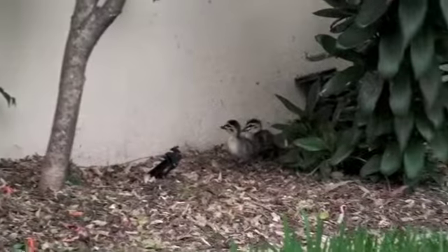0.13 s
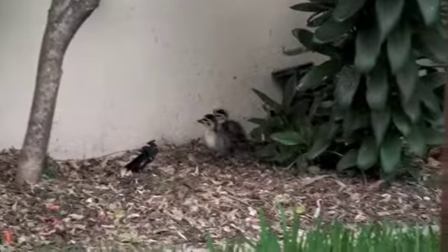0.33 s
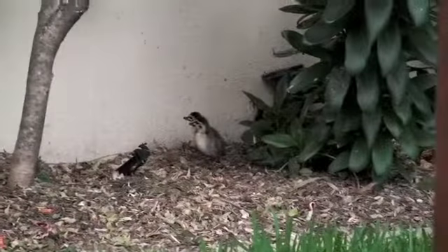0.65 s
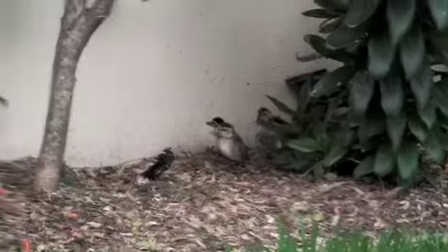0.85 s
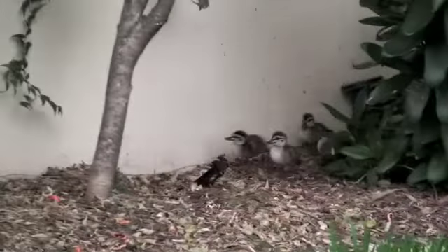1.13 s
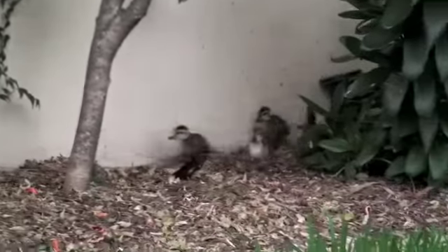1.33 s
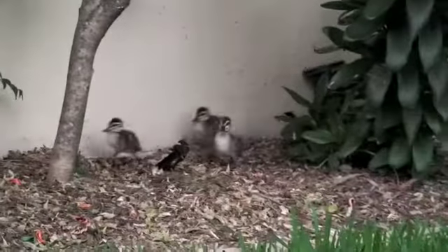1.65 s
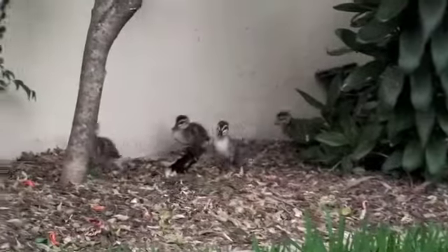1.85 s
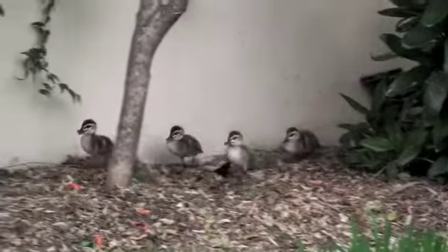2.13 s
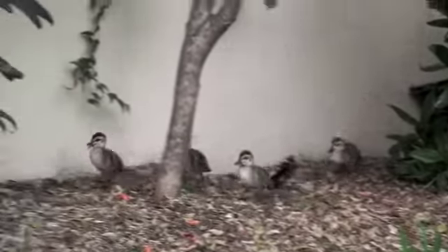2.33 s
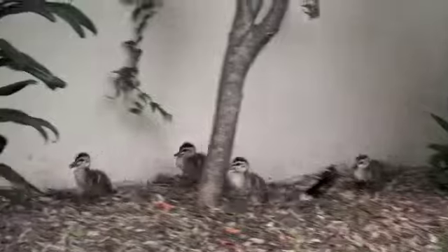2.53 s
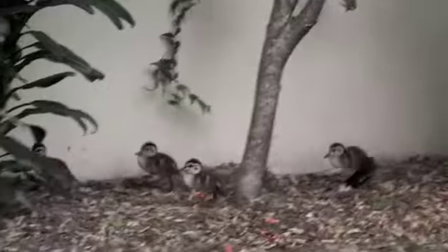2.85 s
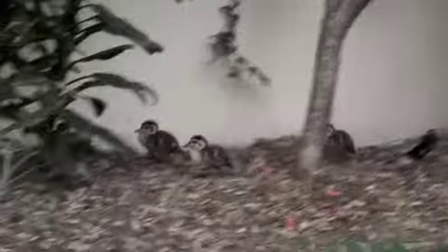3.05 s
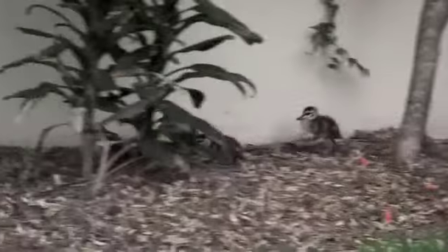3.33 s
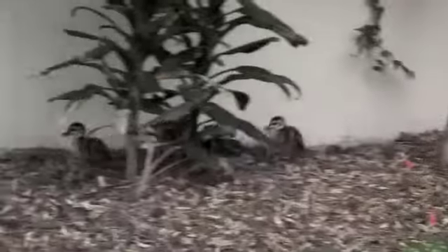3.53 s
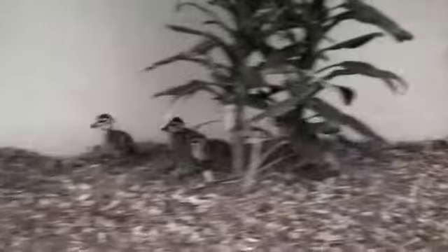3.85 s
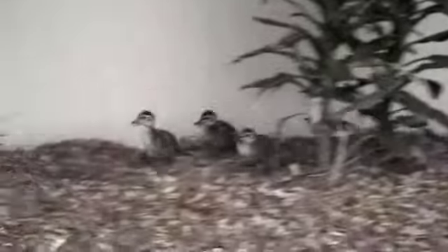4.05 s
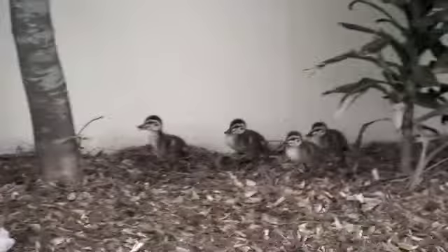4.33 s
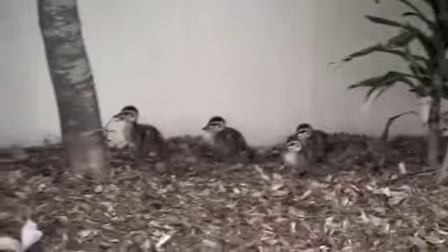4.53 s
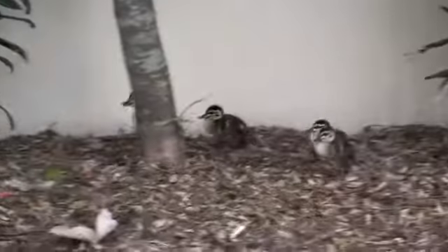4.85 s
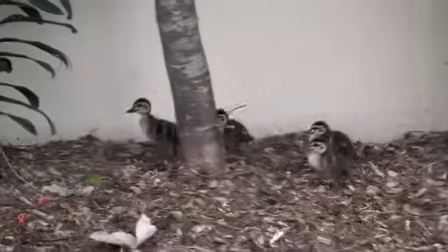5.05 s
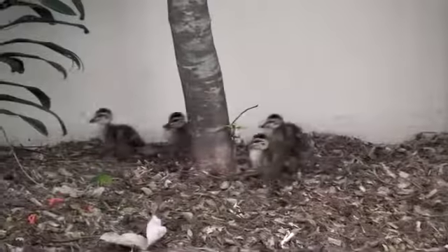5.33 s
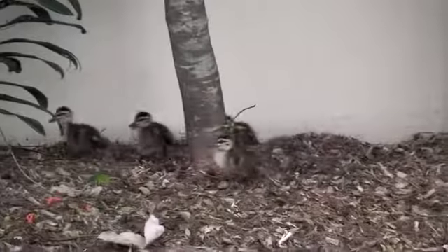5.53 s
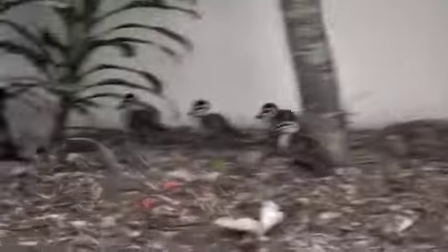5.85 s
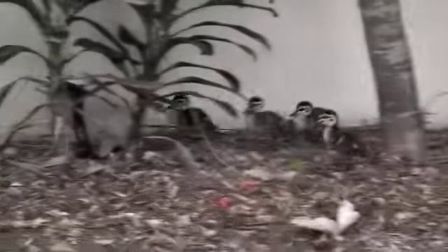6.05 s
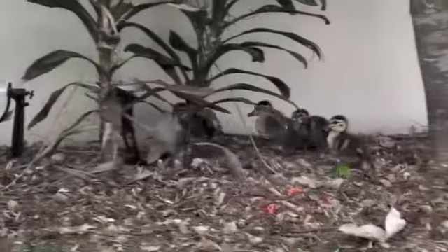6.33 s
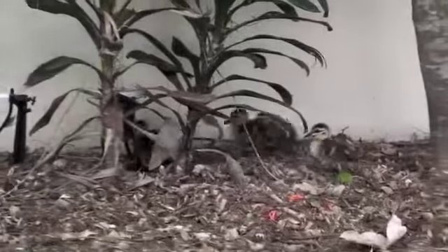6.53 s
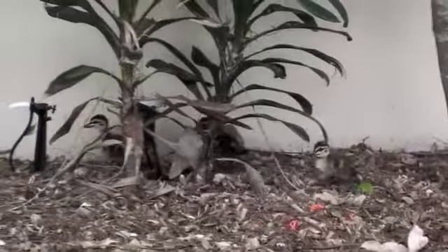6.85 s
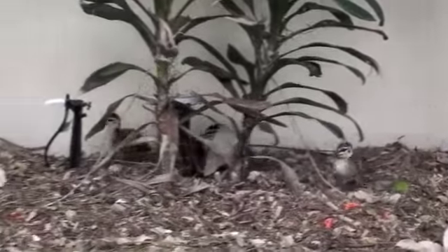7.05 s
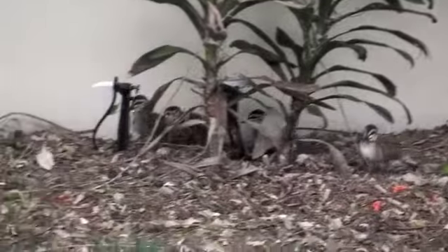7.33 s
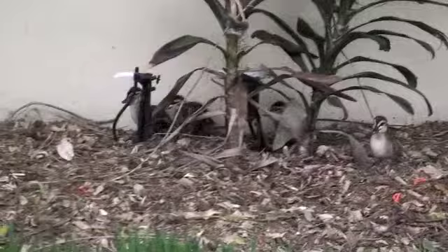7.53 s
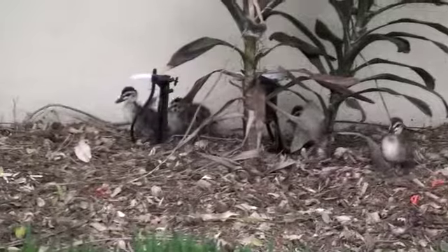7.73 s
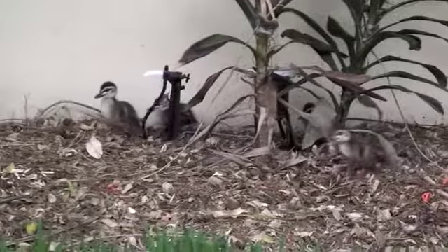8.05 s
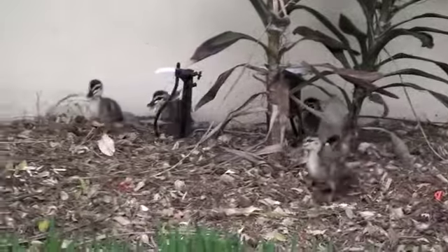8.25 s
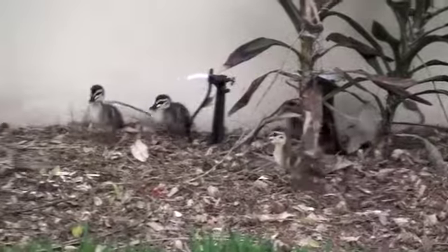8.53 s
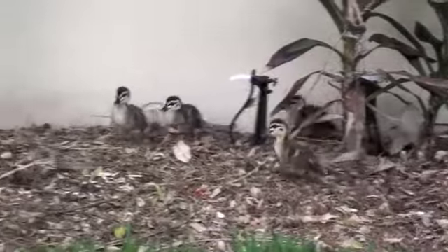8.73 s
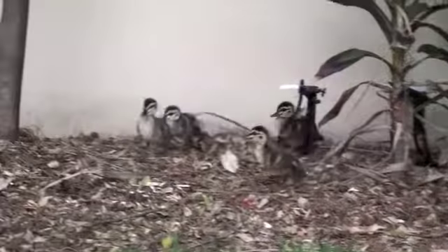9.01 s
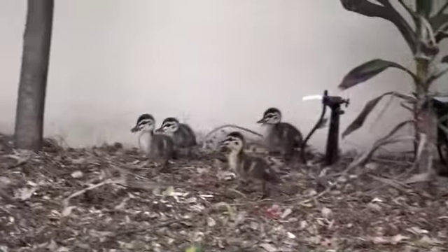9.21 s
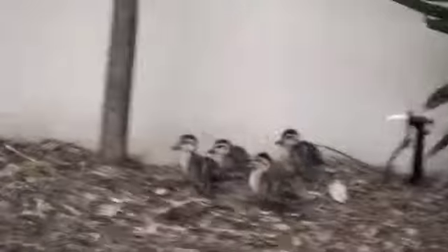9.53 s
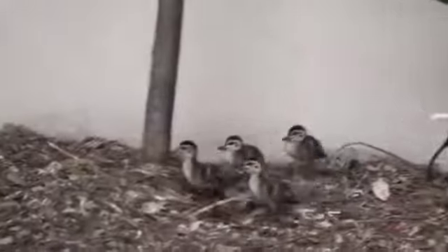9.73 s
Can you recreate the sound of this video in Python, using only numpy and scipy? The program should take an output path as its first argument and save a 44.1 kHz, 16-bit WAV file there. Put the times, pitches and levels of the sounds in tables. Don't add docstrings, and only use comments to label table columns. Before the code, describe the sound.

Four ducklings walk along a mulch bed by a garden wall. Faint, even peeps come first, then overlapping brighter calls from several birds, a quieter stretch with light foot crackles, and finally a loud, regular run of pure, rising whistles about four per second. Distant traffic and low engine drone sit behind. A hand-held microphone catches short wall reflections and one dull finger tap near the end.

```python
import sys
import numpy as np
from scipy import signal
from scipy.fft import rfft, irfft, next_fast_len
from scipy.io import wavfile
from scipy.ndimage import uniform_filter1d

SR = 44100
rng = np.random.default_rng(int(sys.argv[2]) if len(sys.argv) > 2 else 0)


def materialize(psi):
    bounded = np.clip(np.atleast_2d(psi).T, -1, 1)
    quanta = np.round(bounded * 32767).astype(np.int16)
    wavfile.write(sys.argv[1], SR, quanta)


def natural_amplitude(level_db):
    exponent = np.asarray(level_db, float) / 20
    return 10 ** exponent


N = 435701

# (start [s], length [s], opening pitch [Hz], reached pitch [Hz], level [dB])
LOUD_BIRD = [
    (-.06, .085, 4400, 4700, -19),
    (7.734, 0.071, 4170, 4530, -23.5),
    (7.965, .09, 4320, 4650, -22),
    (8.214, .097, 4260, 4520, -22),
    (8.474, 0.079, 4250, 4500, -19.5),
    (8.724, .084, 4390, 4570, -22),
]
LOUD_LATE = [
    (8.982, 0.071, 4360, 4600, -21),
    (9.234, 0.079, 4310, 4575, -20.5),
    (9.514, 0.0835, 4360, 4560, -21.5),
    (9.779, 0.077, 4384, 4570, -17.5),
]
RIGHT_BIRD = [
    (3.294, .11, 3920, 4520, -25),
    (2.484, 0.11, 4080, 4330, -26.5),
    (2.748, 0.1, 4050, 4360, -19),
    (3.018, .094, 4020, 4280, -23),
    (3.834, .105, 4066, 4453, -20),
    (4.645, .124, 4040, 4380, -24.5),
    (4.934, 0.11, 4024, 4187, -28),
]
MIDDLE_BIRD = [
    (3.624, .07, 4400, 4450, -32),
    (3.64, .08, 4150, 4400, -30),
    (3.904, 0.057, 4380, 4480, -27.5),
    (4.1, .075, 4050, 4460, -28),
    (4.135, .085, 4100, 4330, -28),
    (4.365, .1, 4200, 4400, -31),
    (4.385, .115, 4060, 4320, -24.5),
    (6.624, .054, 3970, 4030, -35.5),
]
LEFT_BIRD = [(2.7, 0.044, 4190, 4350, -41.5), (3.4, .05, 4215, 4330, -35), (2.924, 0.091, 4110, 4390, -34),
             (3.174, 0.056, 4090, 4460, -36), (3.572, 0.047, 4030, 4400, -35),
             (4.625, .09, 4200, 4460, -35), (3.13, .04, 4100, 4130, -40), (4.884, 0.12, 4160, 4370, -35),
             (5.154, 0.083, 4130, 4280, -37.5), (5.474, 0.081, 4110, 4320, -39.5),
             (6.154, 0.071, 3930, 4110, -46), (6.404, 0.086, 4190, 4325, -37.5),
             (6.644, 0.1, 4230, 4280, -40), (7.144, .075, 4185, 4290, -35), (7.404, 0.09, 4200, 4285, -37),
             (7.634, 0.11, 3950, 4325, -37), (7.884, 0.11, 3860, 4194, -36.5),
             (8.404, .096, 3760, 4330, -36.5), (8.664, 0.11, 3810, 4340, -36),
             (8.934, .114, 3720, 4200, -42), (9.204, 0.093, 3700, 3860, -39.5)]
REEDY_BIRD = [(9.504, .096, 3890, 4180, -31), (2.224, 0.1, 3950, 4140, -37.5),
              (5.284, 0.081, 3760, 3903, -33), (6.094, 0.051, 3800, 3900, -42),
              (6.284, .075, 3940, 4100, -43), (6.524, 0.078, 3970, 4110, -37),
              (8.979, 0.077, 3440, 3670, -38.5), (9.254, 0.091, 3960, 4140, -33),
              (9.764, .105, 3900, 4090, -33.5)]
SOFT_LEFT = [
    (6.364, .075, 3940, 3970, -43),
    (7.124, 0.068, 3950, 4080, -42.5),
    (7.374, 0.048, 3920, 4020, -41),
    (8.714, 0.066, 3560, 3460, -44),
]
SOFT_RIGHT = [
    (4.324, .095, 4700, 5560, -48),
    (4.40, .1, 3600, 3980, -51),
    (4.344, 0.089, 6570, 7400, -52.5),
    (4.424, 0.078, 1933, 1900, -48),
    (4.624, 0.096, 4960, 5800, -54),
    (6.314, 0.042, 5000, 5140, -43.5),
    (6.534, .084, 4900, 5000, -43.5),
]
DROOPING = [
    (5.778, .065, 3880, 3600, -47.5),
    (5.204, 0.073, 3600, 3530, -48),
    (7.234, .075, 3780, 3350, -49),
    (8.44, .085, 3450, 3120, -44),
]
LEFT_EARLY = [
    (.122, 0.092, 3940, 4240, -39),
    (.398, 0.085, 3930, 4240, -38.5),
    (.678, .095, 3950, 4230, -40),
    (.975, 0.097, 3890, 4240, -41),
]
ARCHING = [
    (1.7, .082, 3400, 3630, -37),
    (7.495, .045, 3940, 3990, -41),
    (6.07, .045, 4770, 4800, -47),
]
SWOOPING = [
    (6.915, .085, 3500, 4190, -43),
    (8.174, .08, 3450, 3980, -40.5),
    (5.9, 0.086, 3680, 3920, -42),
    (1.985, .095, 3420, 4090, -35.5),
]
PLUNGING = [
    (6.862, .04, 4000, 3300, -46.5),
    (7.535, .022, 3950, 3250, -46),
]
# (peeps, settings); pan_db left minus right [dB], second_db second harmonic [dB],
# top_at when the pitch arrives [share], bend curve of the climb [exponent], sag fall back [share],
# loud_at greatest effort [share], open_db and close_db effort at the ends [dB]
FLOCK = [ (LOUD_BIRD, dict(pan_db=0.04, second_db=-31.5, top_at=0.695, bend=1.78, sag=0.041, loud_at=0.4, open_db=-4, close_db=-6.5)),
         (LOUD_LATE, dict(pan_db=0.16, second_db=-33, top_at=0.543, bend=1.21, sag=.05, loud_at=0.069, open_db=-0.5, close_db=-5)),
         (LEFT_EARLY, dict(pan_db=3, second_db=-30, top_at=.5, bend=1.5, sag=-0.68, loud_at=0.54, open_db=-4.5, close_db=-4)),
         (SWOOPING, dict(pan_db=1.1, second_db=-24, top_at=.6, bend=1.6, sag=.08, loud_at=0.48, open_db=-8, close_db=-6)),
         (PLUNGING, dict(pan_db=3, second_db=-35, top_at=.97, bend=1.1, sag=.01, loud_at=.1, open_db=-1.1, close_db=-6)),
         (ARCHING, dict(pan_db=-0.4, second_db=-35, top_at=0.39, bend=1.6, sag=1.3, loud_at=.5, open_db=-7, close_db=-4)),
         (RIGHT_BIRD, dict(pan_db=-1.3, second_db=-28, top_at=.55, bend=1.107, sag=0.63, loud_at=0.63, open_db=-12, close_db=-10.5)),
         (MIDDLE_BIRD, dict(pan_db=1.15, second_db=-30.5, top_at=.55, bend=1.4, sag=0.288, loud_at=.55, open_db=-12, close_db=-9)),
         (LEFT_BIRD, dict(pan_db=2.5, second_db=-31, top_at=.9, bend=1.5, sag=.02, loud_at=0.58, open_db=-2.5, close_db=-6.5)),
         (REEDY_BIRD, dict(pan_db=-2, second_db=-15.5, top_at=0.78, bend=1.6, sag=0.11, loud_at=0.56, open_db=-5, close_db=2)),
         (SOFT_LEFT, dict(pan_db=2, second_db=-32, top_at=1, bend=1.06, sag=.01, loud_at=.1, open_db=2, close_db=-6)),
         (SOFT_RIGHT, dict(pan_db=-4, second_db=-33, top_at=1, bend=1.4, sag=.01, loud_at=.4, open_db=0.5, close_db=-1)),
         (DROOPING, dict(pan_db=-0.3, second_db=-33, top_at=.98, bend=.55, sag=.01, loud_at=0.44, open_db=-2, close_db=-5)),
         ]
# (time [s], pitch [Hz], level [dB])
SQUEAKS = [(7.955, 5600, -46), (8.065, 5460, -39), (8.96, 5400, -42), (9.215, 5300, -39.5),
           (9.325, 5400, -38), (8.8, 5900, -41), (5.815, 4520, -50), (3.46, 4500, -37), (3.122, 4540, -39),
           (2.6, 4480, -43), (8.21, 5000, -42), (2.33, 4180, -35.5), (6.36, 5300, -46), (4.225, 4600, -38)]
# (delay [s], level [dB])
WALL = [
    (.004, -24.5),
    (.013, -12),
    (.043, -15),
]
# (time [s], peak level [dB], chip ring [Hz])
STEPS = [(1.129, -35.5, 1140), (2.563, -24.5, 2060), (3.913, -27, 907), (4.301, -27.5, 1900),
         (4.407, -24.5, 940), (4.529, -24.5, 1720), (4.64, -22, 1730), (4.806, -23, 2310),
         (5.354, -25, 1010), (5.476, -24.5, 1700), (5.534, -24, 1860), (6.446, -22.5, 1860),
         (7.965, -26.5, 2170), (8.416, -18.5, 1910), (9.24, -24.5, 1270)]
# (frequency [Hz], level [dB], T60 [s])
BODY = [
    (105, -21, 0.056),
    (1010, -18, 0.016),
    (5700, -17, 0.0044),
    (9500, -19, 0.0064),
]
# (time [s], roar [dB], low drone [dB], high drone [dB], leaf hiss [dB])
ROAD = [
    (0, -38.5, -45, -49, -54.5),
    (0.6, -40.5, -48, -49, -53.5),
    (1.5, -41.5, -47, -53.5, -51),
    (2.4, -41.5, -44.5, -44, -54),
    (3.4, -42.5, -46.5, -43.5, -56),
    (5.5, -44.5, -52, -48, -57.5),
    (9.88, -44, -60, -48, -57.5),
]
# (frequency [Hz], density [dB per Hz])
AIR = [(18, -45), (30, -10), (69, -1.5), (134, -8), (293, -6.5), (508, -13.5), (695, -11.5), (1980, -14),
       (3010, -17.5), (4240, -17.5), (5360, -21), (8160, -24.5), (10900, -32), (12100, -27.5), (15700, -40)]
# (frequency [Hz], side minus mid [dB])
WIDTH = [
    (40, -29),
    (250, -16),
    (700, -10.5),
    (2000, -9.5),
    (6000, -9),
    (10800, -5),
    (11800, -40),
]


def ducklings(puff_s=.024, puff_db=-14):
    near, far = np.zeros((2, N)), np.zeros((2, N))
    shake, flutter = walk(150), walk(90)
    flutter = flutter - flutter.mean()
    air = band(rng.standard_normal(N), 4300, 5850)
    puff = np.hanning(int(puff_s * SR))
    for peeps, voice in FLOCK:
        pan_db, second_db, *shape = voice.values()
        send_db = np.clip(3 * pan_db, -3, 12)
        for note in peeps:
            begin, call = peep(note, pan_db, second_db, shape, shake, flutter)
            add(near, call, begin, pan_db)
            add(far, call * natural_amplitude(send_db), begin, pan_db)
            start, length, _, _, peak_db = note
            for edge in (start - puff_s, start + length):
                i = int(max(edge, 0) * SR)
                breath = air[i:i + len(puff)] * puff[:N - i]
                add(near, breath * natural_amplitude(peak_db + puff_db), i / SR, pan_db)
    return near, far


def peep(note, pan_db, second_db, shape, shake, flutter, edge_s=.009, slur_s=.009, flick_hz=700,
         third_db=-8, shake_hz=25, shake_db=2.6):
    start, length, from_hz, to_hz, peak_db = note
    end = start + length
    t = np.arange(max(start - edge_s, 0), end + edge_s, 1 / SR)
    i = np.minimum((t * SR).astype(int), N - 1)
    hz, db = manner(np.clip((t - start) / length, 0, 1), from_hz, to_hz, peak_db, *shape)
    beyond = np.clip(np.maximum(start - t, t - end) / edge_s, 0, 1)
    direction = np.where((t > end) & (to_hz < from_hz), -1, 1)
    flick = flick_hz * direction * beyond ** 2
    pitch = uniform_filter1d(hz, int(slur_s * SR)) + flick + (shake_hz + 3 * abs(pan_db)) * shake[i]
    phase = 2 * np.pi * np.cumsum(pitch) / SR
    bright = natural_amplitude(second_db - 8 * np.clip((end - t) / length - .4, 0, 1))
    overtones = np.sin(2 * phase) + natural_amplitude(third_db) * np.sin(3 * phase)
    tone = np.sin(phase) + bright * overtones
    tremor_db = (shake_db + .25 * abs(pan_db)) * flutter[i]
    edge_db = np.where(t < start, 16, 8) * beyond
    effort = natural_amplitude(db + tremor_db - edge_db)
    return t[0], np.sqrt(2) * tone * effort * np.sqrt(1 - beyond)


def manner(share, from_hz, to_hz, db, top_at, bend, sag, loud_at, open_db, close_db):
    def before(at):
        return np.clip(1 - share / at, 0, 1)

    def after(at):
        return np.clip((share - at) / (1 - min(at, .99)), 0, 1)

    short_of_goal = before(top_at) ** bend + sag * after(top_at) ** 1.49
    hz = to_hz - (to_hz - from_hz) * short_of_goal
    return hz, db + open_db * before(loud_at) ** 1.76 + close_db * after(loud_at) ** 1.95


def squeaks(length_s=.03, width_hz=260):
    out, shape = np.zeros((2, N)), np.hanning(int(length_s * SR))
    for s, hz, db in SQUEAKS:
        air = band(rng.standard_normal(4096), hz - width_hz / 2, hz + width_hz / 2)
        air = air[-len(shape):]
        add(out, air / np.std(air) * shape * natural_amplitude(db), s - length_s / 2, 1.2)
    return out


def yard(sent, t60_s=.55, tail_db=-11):
    t = np.arange(int(t60_s * SR)) / SR
    decay = natural_amplitude(-60 * t / t60_s) * np.minimum(t / .0062, 1)
    shared, left, right = rng.standard_normal((3, len(t))) * decay
    wet = []
    for channel, own in zip(sent, (left, right)):
        echo = shared + .41 * own
        echo = echo * natural_amplitude(tail_db) / np.sqrt(np.sum(echo ** 2))
        for delay, db in WALL:
            echo[int(delay * SR)] += natural_amplitude(db)
        wet.append(signal.fftconvolve(channel, echo)[:N])
    return np.array(wet)


def mulch():
    out = np.zeros((2, N))
    for s, db, hz in STEPS:
        pan_db = 2 * rng.standard_normal()
        chip = ring(hz, db - 2, .014) + ring(1.37 * hz, db - 11.5, .014)
        add(out, chip, s, pan_db)
        add(out, band(crack(db - 19, .008), 600, 9000), s, pan_db)
    hits = rng.random((2, N)) < 60 / SR
    crumbs = hits * rng.standard_normal((2, N)) * natural_amplitude(3.5 * walk(2.9) - 34)
    return out + band(crumbs + .26 * crumbs[::-1], 1500, 16000)


def tap(tap_s=9.4135):
    out = np.zeros((2, N))
    for hz, db, t60 in BODY:
        lag_s = .001 if hz > 2000 else -.0005
        add(out, ring(hz, db, t60), tap_s + lag_s, 3)
    add(out, band(crack(-16, .017), 300, 3100), tap_s + .00113, -2.5)
    return out


def road():
    s, *columns = np.transpose(ROAD)
    roar_db, low_db, high_db, leaf_db = (np.interp(np.arange(N) / SR, s, c) for c in columns)
    hz, db = np.transpose(AIR)
    width_hz, width_db = np.transpose(WIDTH)
    side_db = db + np.interp(np.log(hz), np.log(width_hz), width_db)
    side = shaped(np.transpose([hz, side_db]))
    air = shaped(AIR) + np.array([[1], [-1]]) * side
    air = air * natural_amplitude(-40) / np.std(air)
    roar = band(air, 150, 5700) * (natural_amplitude(roar_db - roar_db.min() + .13 * walk(2.22)) - 1)
    leaves = band(air, 3850, 10500) * (natural_amplitude(leaf_db - leaf_db.min() + .23 * walk(3.02)) - 1)
    low = drone(52) * natural_amplitude(low_db + 4.5 * walk(12))
    high = drone(76) * natural_amplitude(high_db + 3.8 * walk(10))
    return air + roar + leaves + low + high


def drone(hz):
    return np.sin(2 * np.pi * np.cumsum(hz + 7 * walk(12)) / SR)


def shaped(points):
    size = next_fast_len(N)
    hz, db = np.transpose(points)
    bins_hz = np.arange(size // 2 + 1) * SR / size
    gain = natural_amplitude(np.interp(np.log(bins_hz + 1), np.log(hz), db))
    return irfft(rfft(rng.standard_normal(size)) * gain, size)[:N]


def walk(rate):
    k = int(SR / rate)
    held = np.repeat(rng.standard_normal(N // k + 1), k)
    return uniform_filter1d(uniform_filter1d(held, k), k)[:N]


def ring(hz, db, t60):
    t = np.arange(int(t60 * SR)) / SR
    return natural_amplitude(db - 60 * t / t60) * np.sin(2 * np.pi * hz * t)


def crack(db, t60):
    t = np.arange(int(t60 * SR)) / SR
    return natural_amplitude(db - 60 * t / t60) * rng.standard_normal(len(t))


def band(x, low_hz, high_hz):
    return signal.sosfilt(signal.butter(2, [low_hz, high_hz], "band", fs=SR, output="sos"), x)


def add(out, sound, s, pan_db):
    i = int(s * SR)
    sound = sound[:N - i]
    out[:, i:i + len(sound)] += sound * natural_amplitude(np.array([[pan_db], [-pan_db]]) / 2)


def hollowed(x, margin_db=32, slope_db=7.5):
    hz, _, z = signal.stft(x, SR, nperseg=1024)
    power = np.mean(abs(z) ** 2, axis=0)
    whistle = power[(hz > 3500) & (hz < 4700)].max(axis=0)
    hz = hz[:, None]
    limit = whistle * natural_amplitude(-2 * (margin_db + slope_db * (hz - 4700) / 1000))
    quiet = uniform_filter1d(power, size=10, axis=0) < limit
    drop = quiet & (hz > 4750) & (hz < 6800)
    return signal.istft(z * ~drop, SR, nperseg=1024)[1][:, :N]


def scene():
    near, far = ducklings()
    feet = mulch() + squeaks()
    return near + feet + yard(far + feet) + tap() + road()


def band_limit(x):
    return signal.sosfilt(signal.butter(12, 16510, fs=SR, output="sos"), x)


def record(dry, top_hz=15720, stereo_top_hz=11700):
    cut = signal.sosfilt(signal.ellip(10, .2, 70, top_hz, fs=SR, output="sos"), hollowed(dry))
    narrow = signal.butter(6, stereo_top_hz, fs=SR, output="sos")
    side = signal.sosfiltfilt(narrow, cut[0] - cut[1]) / 2
    return band_limit(cut.mean(axis=0) + np.array([side, -side]))


dry = scene()
out = record(dry)
materialize(out)
```